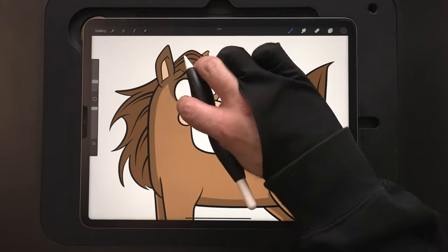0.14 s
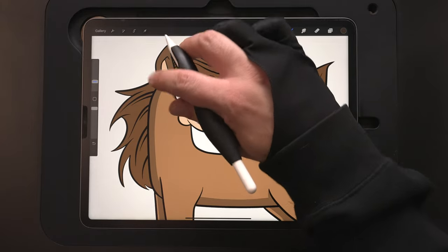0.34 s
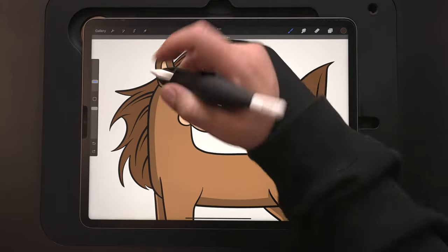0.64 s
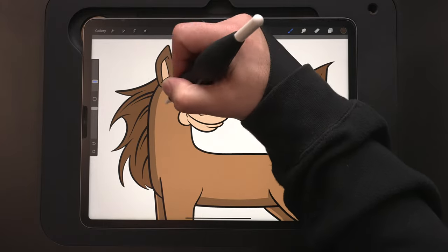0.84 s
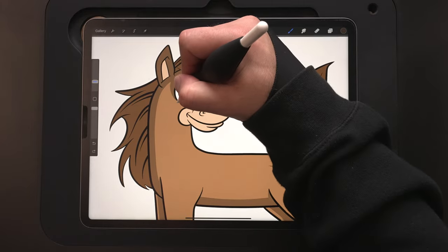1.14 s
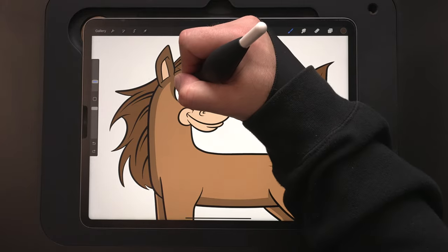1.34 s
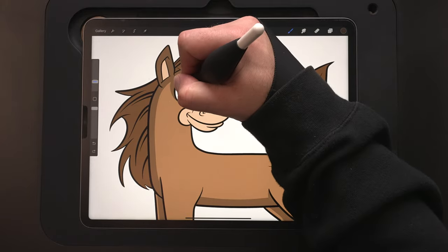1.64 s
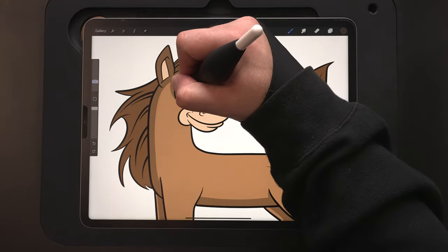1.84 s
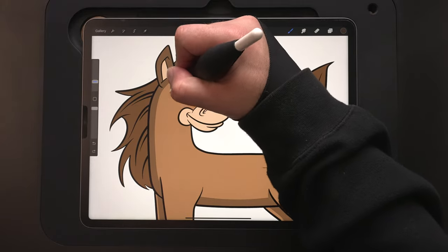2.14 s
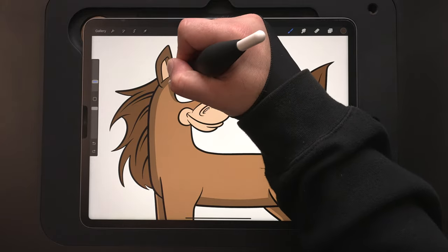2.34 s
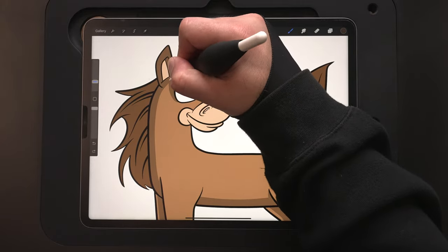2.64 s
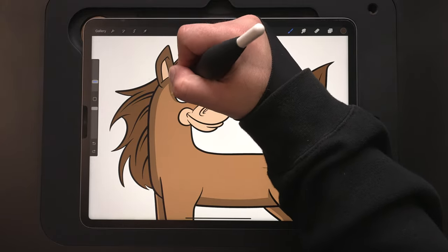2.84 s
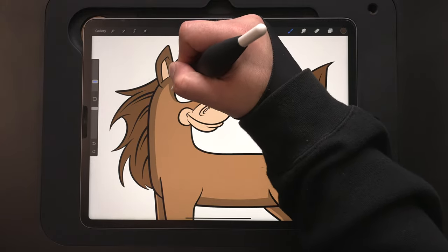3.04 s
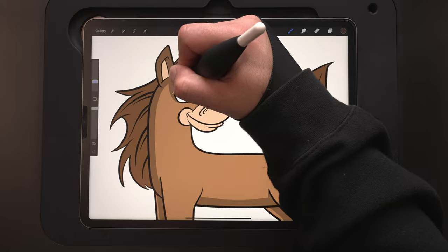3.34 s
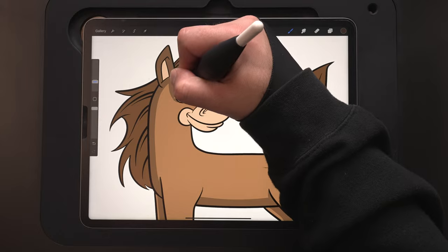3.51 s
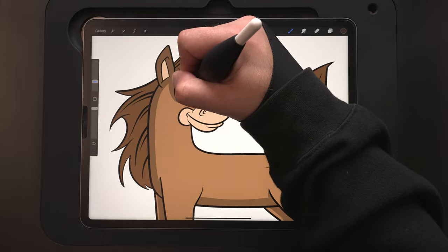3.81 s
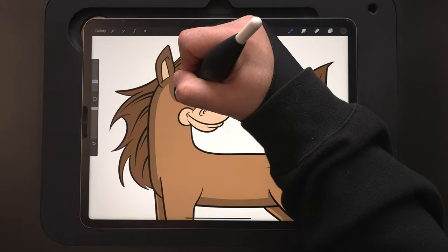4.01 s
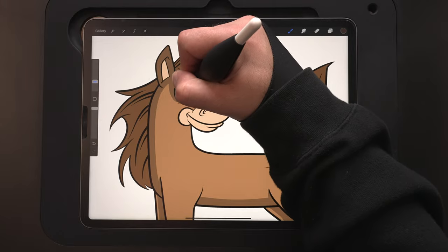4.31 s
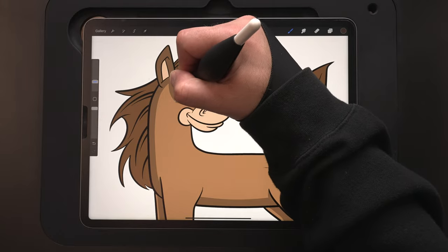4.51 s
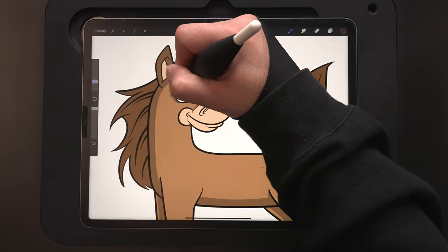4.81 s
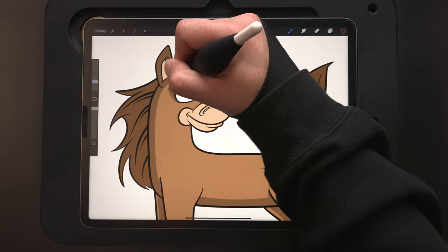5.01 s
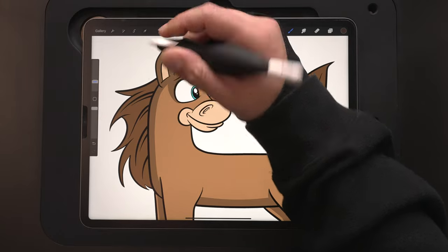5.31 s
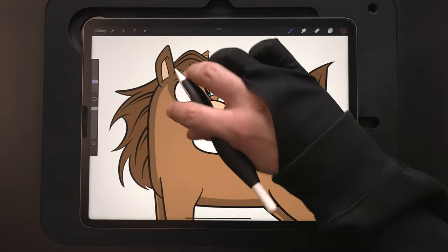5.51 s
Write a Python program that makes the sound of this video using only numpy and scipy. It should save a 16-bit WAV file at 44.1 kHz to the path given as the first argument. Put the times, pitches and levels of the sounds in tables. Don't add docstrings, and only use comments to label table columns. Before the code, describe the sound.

Close to the microphone in a quiet room, a finger lands softly on a drawing tablet, then stutters three quick dull knocks, followed by a deep subsonic wobble of the stand. Low hum, ventilation and a muffled engine beyond the wall continue. A faint stylus tap comes midway; cloth brushes the desk at the end.

```python
import sys
import numpy as np
from scipy import signal
from scipy.fft import rfft, irfft, next_fast_len
from scipy.io import wavfile
from scipy.ndimage import uniform_filter1d, map_coordinates

SR = 44100
rng = np.random.default_rng(int(sys.argv[2]) if len(sys.argv) > 2 else 0)


def voltage_ratio(level):
    return 10 ** (np.asarray(level, float) / 20)


def unload_wav(signal):
    wavfile.write(
        sys.argv[1],
        SR,
        np.round(np.clip(np.atleast_2d(signal).T, -1, 1) * 32767).astype(np.int16),
    )


N = 249606
TIME = np.arange(N) / SR


def unit(x):
    return x / np.sqrt(np.mean(x ** 2) + 1e-20)


def along(points, hz):
    f, v = np.transpose(points)
    return np.interp(np.log(hz + 1), np.log(f + 1), v)


def wobble(rate):
    knots = rng.standard_normal(400)
    return map_coordinates(knots, [TIME * rate])


def noise(gain):
    m = next_fast_len(N + 8192)
    spectrum = rfft(rng.standard_normal(m)) * gain(np.fft.rfftfreq(m, 1 / SR))
    return unit(irfft(spectrum, m)[:N])


def tone(hz):
    turns = np.cumsum(hz * np.ones(N)) / SR
    return np.sqrt(2) * np.sin(2 * np.pi * (turns - turns[-1]))


def bump(s, length):
    return np.exp(-2 * ((TIME - s) / (length / 2)) ** 2)


def hum():
    # frequency in Hz, rms level in dB, direction (+1 or -1).
    tones = [
        (120.07, -59.5, 1),
        (240.1, -70, 1),
        (10031.2, -84, 1),
        (10034.25, -88.5, -1),
        (6057.2, -97, 1),
    ]
    total = 0
    for hz, db, way in tones:
        level = voltage_ratio(db + 1.2 * wobble(2.39))
        total = total + way * level * tone(hz)
    return total


def air():
    # frequency in Hz, level in dB per Hz.
    rumble_db = [(26, -40), (45, 2), (86, -9.5), (100, -4.5), (119, -4.5), (137, -7), (146, -11),
                 (178, -10.5), (210, -67), (242, -27), (300, -30), (390, -77), (660, -120)]
    # frequency in Hz, level in dB per Hz.
    air_db = [(120, -48), (200, -2.5), (211, -4.5), (240, -9.5), (268, -10.5), (352, -12.5), (393, -15),
              (480, -15), (507, -18.5), (587, -13.5), (718, -13), (927, -17), (3510, -24.5), (10300, -24.5),
              (15700, -27)]
    # frequency in Hz, width in Hz, gain in dB.
    fuzzy_lines = [(170, 5.4, -11), (360.7, 19, 5), (489, 6.2, 9.5), (601, 11.7, 5.5), (708, 21.5, 2.5),
                   (739, 24, 4.5)]

    def rumble_gain(hz):
        return voltage_ratio(along(rumble_db, hz))

    def hiss_gain(hz):
        lines_db = sum(db / (1 + (2 * (hz - centre) / width) ** 2) for centre, width, db in fuzzy_lines)
        return voltage_ratio(along(air_db, hz) + lines_db)

    rumble = voltage_ratio(-56.5 + 0.73 * wobble(2.36)) * noise(rumble_gain)
    stirred_db = 0.5 * (TIME < 0.25)
    return rumble + voltage_ratio(-62.5 + stirred_db + 0.52 * wobble(5.73)) * noise(hiss_gain)


def engine():
    # time in seconds, firing frequency in Hz, level in dB.
    speed = [(0, 122.6, -48.5), (.8, 125, -72.5), (1.18, 126, -53.5), (1.8, 121, -62.5), (2, 120.3, -43.5),
             (2.55, 118.3, -55.5), (2.73, 111.2, -72), (2.9, 112.4, -59.5), (3.42, 113.5, -49),
             (3.86, 113.9, -55.5), (4.03, 109.1, -59.5), (4.3, 96.91, -49), (4.6, 91.74, -58),
             (4.79, 82.48, -54), (5.1, 81.52, -47), (5.3, 81.04, -51), (5.46, 81, -42.5), (5.57, 83, -57)]
    # time in seconds, length in seconds, added level in dB.
    settle = (4.8, 0.22, 6.7)
    idle_hz, flutter_db = 83, 2.2
    s, firing_hz, firing_db = np.transpose(speed)
    hz, db = np.interp(TIME, s, firing_hz), np.interp(TIME, s, firing_db)

    boom_db = settle[2] * bump(*settle[:2])
    half_db = -56 + boom_db - 0.45 * (hz - idle_hz) + 2 * flutter_db * wobble(4.6)
    second_db = db - 31 + 2 * wobble(4)

    load_shift = uniform_filter1d(np.gradient(second_db - db), size=2000) * SR / 20
    firing = voltage_ratio(db + flutter_db * wobble(8)) * tone(hz + 1.5 * load_shift)
    return firing + voltage_ratio(half_db) * tone(3 * hz / 2) + voltage_ratio(second_db) * tone(2 * hz)


def arm():
    # frequency in Hz, peak in dB, start in seconds, rise in seconds, t60 in seconds.
    arm_modes = [(12.92, -23, .36, .015, 5), (17.9, -21.9, .312, .017, 2.6),
                 (27.95, -22.8, .268, .046, 5.7), (33.5, -26.3, .214, .025, .54)]
    # time in seconds, added t60 in seconds.
    grips = [(1.3, 1.3), (1.3, .45), (.52, .47), (.5, .2)]
    crests = [.3814, .3814, .374, .3814]
    # centre and length in seconds, lowest and second mode levels in dB.
    leans = [(0.113, 0.8, -38, -47.5), (1.113, 0.89, -33.5, -41), (1.922, 1, -39, -66),
             (2.4, 1, -48.5, -59), (3.148, 0.63, -39.5, -44), (3.284, 0.12, -56, -38),
             (3.67, 0.57, -34, -51), (4.06, 0.65, -34, -44), (4.613, 0.4, -46.5, -41.5),
             (4.912, 0.56, -40.5, -65), (5.126, 0.13, -60, -41), (5.437, 0.34, -65, -32),
             (5.578, 0.22, -30, -42.5)]
    upper_db = [-21.5, -13]
    tremors = [-55.5, -46, -60.5, -62]

    low = sum(voltage_ratio(row[2]) * bump(*row[:2]) for row in leans)
    second = sum(voltage_ratio(row[3]) * bump(*row[:2]) for row in leans)
    lean_sizes = [low, second, *np.outer(voltage_ratio(upper_db), second)]
    sway = 0
    for mode, grip, lean, tremor_db, crest in zip(arm_modes, grips, lean_sizes, tremors, crests):
        hz, db, s, rise, t60 = mode
        held_s, held_t60 = grip
        since = np.clip(TIME - s, 0, None)
        held = np.clip(TIME - held_s, 0, None)
        decay = voltage_ratio(db - 60 * since / t60 - 60 * held / held_t60)
        ring = decay * (1 - np.exp(-(since / rise) ** 2))
        size = ring + lean + voltage_ratio(tremor_db) * wobble(6)
        wander = .025 * np.clip(TIME - 1.4, 0, 1) * wobble(3)
        turns = np.cumsum(hz * (1 + wander)) / SR
        sway = sway + np.sqrt(2) * size * np.cos(2 * np.pi * (turns - hz * crest))
    return sway * np.clip((TIME[-1] - TIME) / .03 + .1, 0, 1)


def taps():
    # start in seconds, peak in dB, contact time in ms, direction (+1 or -1), desk thud in dB.
    contacts = [
        (.1937, -48, .05, -1, -54),
        (.1947, -51, .1, -1, -60),
        (.1976, -49.5, .15, -1, -60),
        (.24353, -32, .01, 1, -47),
        (.27929, -31.6, .01, 1, -53),
        (.31677, -31.8, .01, 1, -47),
        (3.0906, -54, .05, -1, -60),
        (3.0913, -50, .7, -1, -52),
    ]
    # frequency in Hz, level in dB, t60
    # in seconds, direction the struck spot moves (+1 or -1).
    tablet_modes = [(226, -9, .069, 1), (382, -10, .054, 1), (431, -13, .084, 1), (505, 14, .01, 1),
                    (637, -5, .023, 1), (793, 9, .009, 1), (966, -2, .015, 1), (1120, -17, .046, -1),
                    (1545, -3, .007, 1), (1791, -5.5, .016, 1), (2080, -6, .017, -1), (2762, 6, .005, -1),
                    (2931, -14, .017, -1), (3330, -10, .017, 1),
                    (165, -22, .25, 1), (365, -20, .3, 1), (810, -23, .25, -1), (1235, -19, .044, -1),
             (1420, -27, .22, 1), (1480, -24, .04, -1), (1620, -27, .04, 1), (2300, -24, .03, 1),
             (3571, -18, .018, 1), (4050, -14, .01, -1), (4650, -19, .007, 1)]
    # frequency in Hz, level in dB, t60 in seconds.
    desk = [(142, -11, 0.043), (298, 13.5, 0.008)]

    out, t = np.zeros(N + SR), np.arange(SR // 4) / SR

    def mode(hz, db, t60):
        return voltage_ratio(db - 60 * t / t60) * np.sin(2 * np.pi * hz * t)

    rise = 1 - np.exp(-t / .00185)
    ring = rise * sum(way * mode(hz, db, t60) for hz, db, t60, way in tablet_modes)
    thud = sum(mode(*row) for row in desk)
    for s, db, contact_ms, way, thud_db in contacts:
        push = np.exp(-1000 * t[:200] / contact_ms)
        knock = np.convolve(ring, push)[:len(t)]
        start = round(s * SR)
        out[start:start + len(t)] += way * (voltage_ratio(db) * knock / knock.max() + voltage_ratio(thud_db) * thud)
    return out[:N]


def rubs():
    # centre in seconds, length in seconds, level in dB, centre frequency in Hz, width in octaves.
    puffs = [(.196, .006, -66, 5400, .25), (.197, .01, -60, 1500, 2), (3.0925, .005, -64.5, 1500, 1.8),
             (.230, .004, -63, 1800, 1.8), (.236, .007, -55, 2300, 1.6), (.30, .12, -67, 1500, 1.5),
             (.355, .06, -63.5, 1450, .9), (.40, .15, -65, 400, 1.4), (.85, .1, -75, 1600, 1.8),
             (2.89, .06, -77, 7000, .3), (5.37, .09, -68.5, 5000, 1.6), (5.387, .06, -64, 2000, 2),
             (5.436, .06, -70, 1700, 1.4), (5.34, .06, -72, 2000, 1.5), (5.5, .08, -72, 1550, .4),
             (5.58, .07, -73, 1600, .4), (5.66, .014, -54, 900, 3.5), (.2455, .006, -60, 2800, 1.8),
             (.2812, .006, -60, 2800, 1.8), (.3187, .006, -60, 2800, 1.8), (5.46, .3, -73, 1500, 1)]
    slips = rng.standard_normal(N // 40)
    grain = voltage_ratio(3 * map_coordinates(slips, [np.arange(N) / 60]))
    total = 0
    for s, length, db, centre, octaves in puffs:
        friction = noise(lambda hz: np.exp(-2 * (np.log2((hz + 1) / centre) / octaves) ** 2))
        total = total + voltage_ratio(db) * bump(s, length) * friction
    return grain * total


def room(x):
    # frequency in Hz, t60 in seconds.
    decay_s = [(150, .24), (1400, .32), (3000, .16), (12000, .1)]
    hz, t, z = signal.stft(rng.standard_normal(SR // 2), SR, nperseg=256)
    fade = voltage_ratio(-60 * t / along(decay_s, hz)[:, None])
    tail = signal.istft(z * fade, SR, nperseg=256)[1]
    delayed = np.pad(x, (200, 0))
    return signal.fftconvolve(delayed, tail / np.linalg.norm(tail))[:N]


def cricket():
    # centre in seconds, length in seconds, level in dB.
    chirps = [(.37, .15, -85), (.89, .09, -81), (1.48, .2, -80), (2.14, .16, -80), (2.67, .13, -79),
              (3.44, .18, -80), (4.13, .18, -83), (4.72, .16, -81), (5.24, .12, -79)]
    pulses = 1.1 + .5 * tone(26 + 3 * wobble(5))
    wing = tone(4655 + 25 * wobble(40)) * pulses
    return wing * sum(voltage_ratio(db) * bump(s, length) for s, length, db in chirps)


def scene():
    near = taps() + rubs()
    wet = voltage_ratio(-12) * room(near)
    mix = near + wet + arm() + engine() + hum() + air() + cricket()
    return mix[None]


def low_pass(x):
    return signal.sosfilt(signal.butter(12, 15740, fs=SR, output="sos"), x)


def record(dry):
    return low_pass(dry)


dry = scene()
out = record(dry)
unload_wav(out)
```